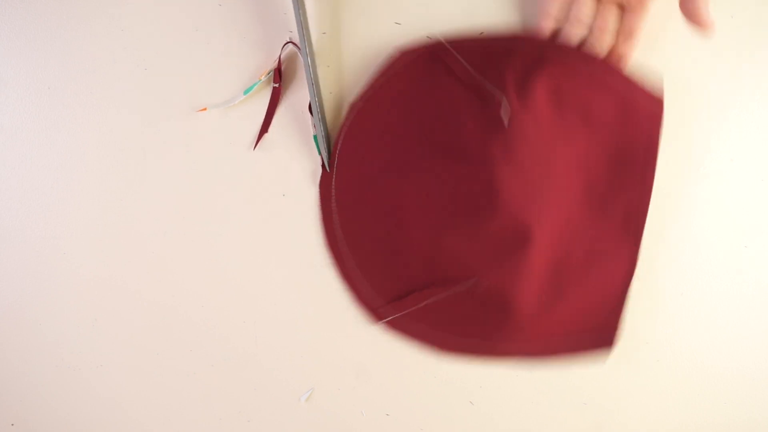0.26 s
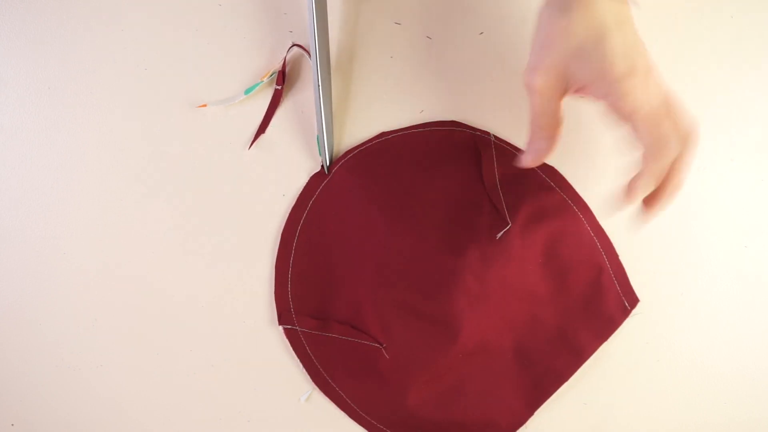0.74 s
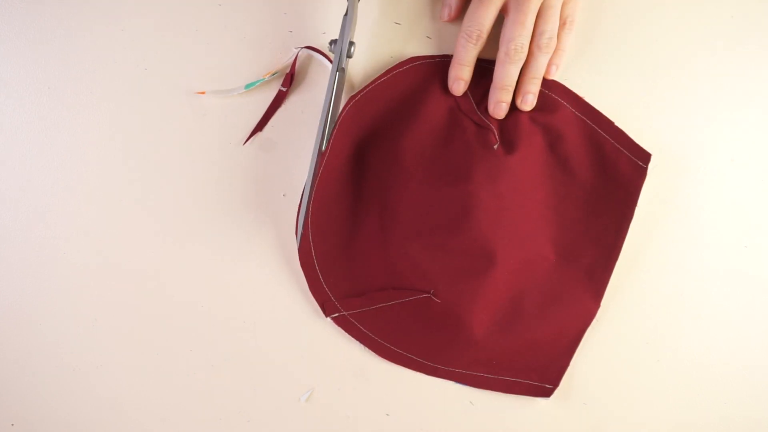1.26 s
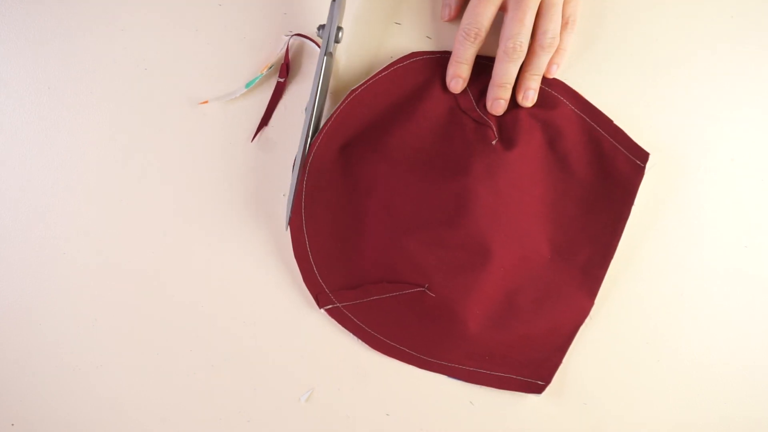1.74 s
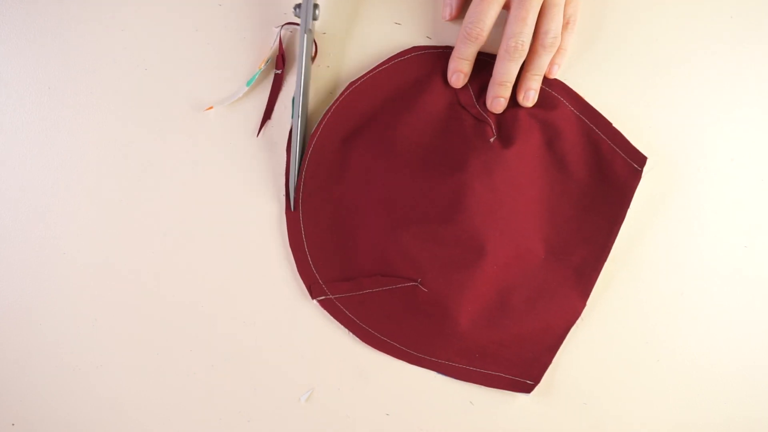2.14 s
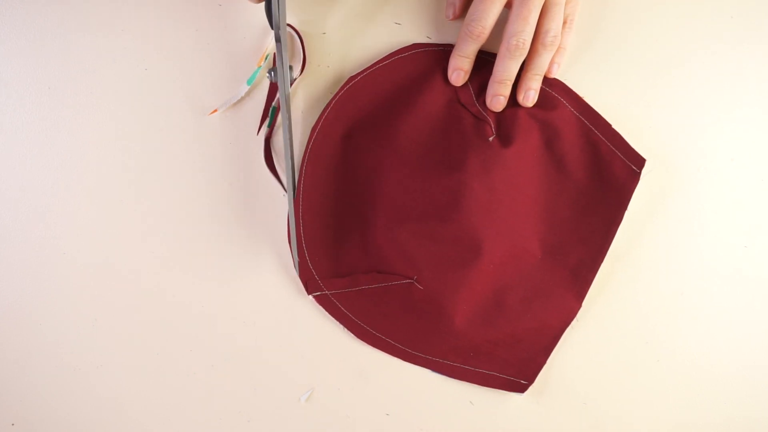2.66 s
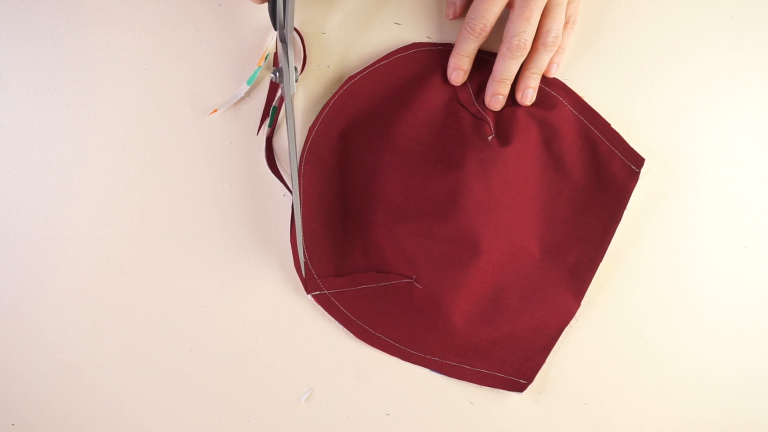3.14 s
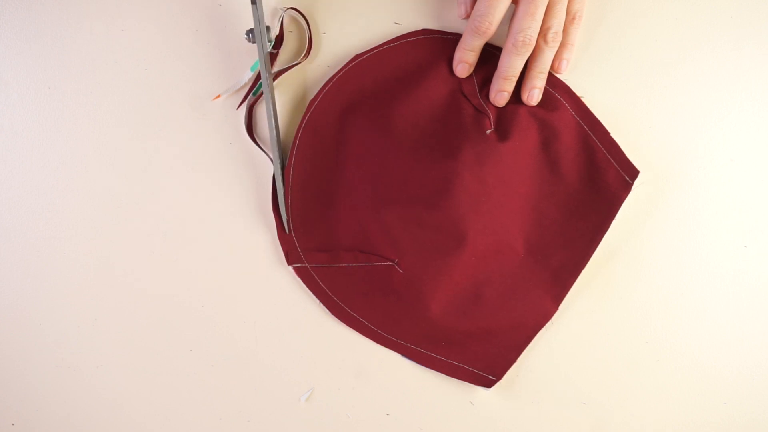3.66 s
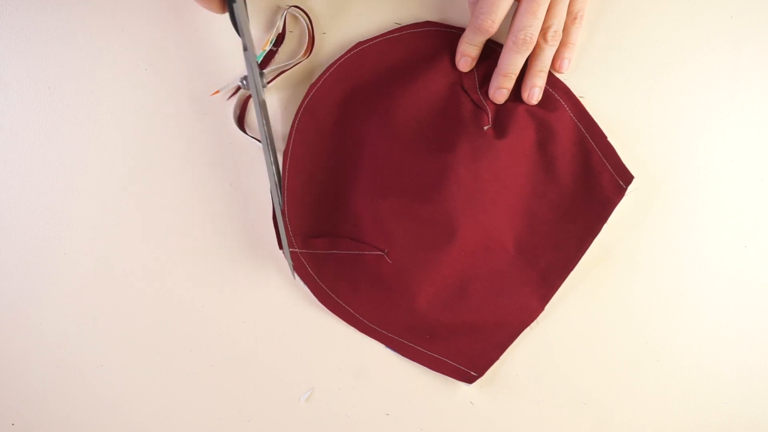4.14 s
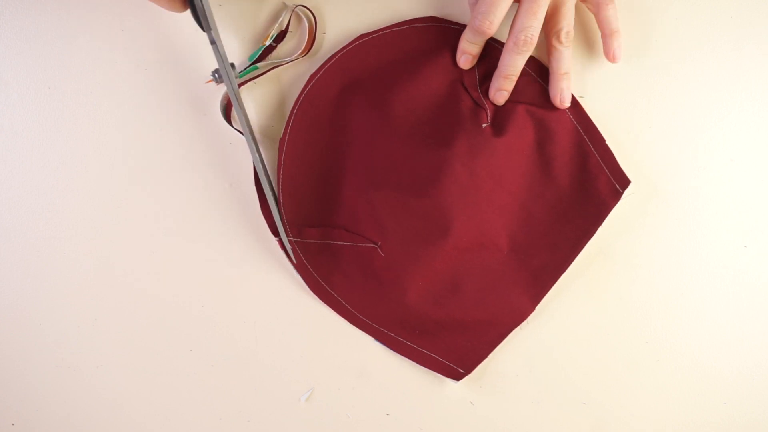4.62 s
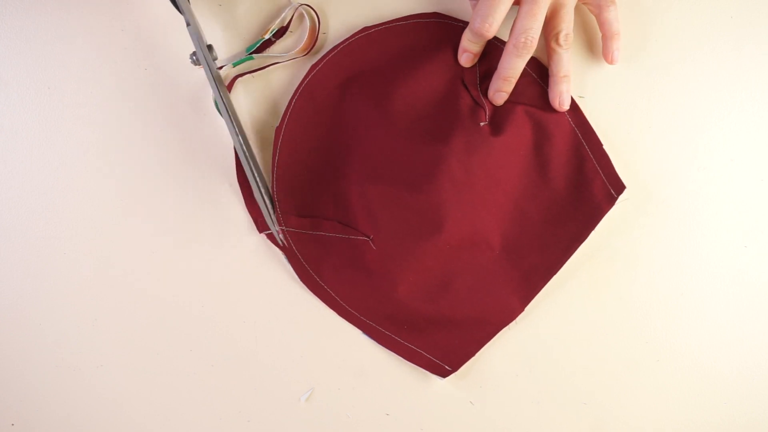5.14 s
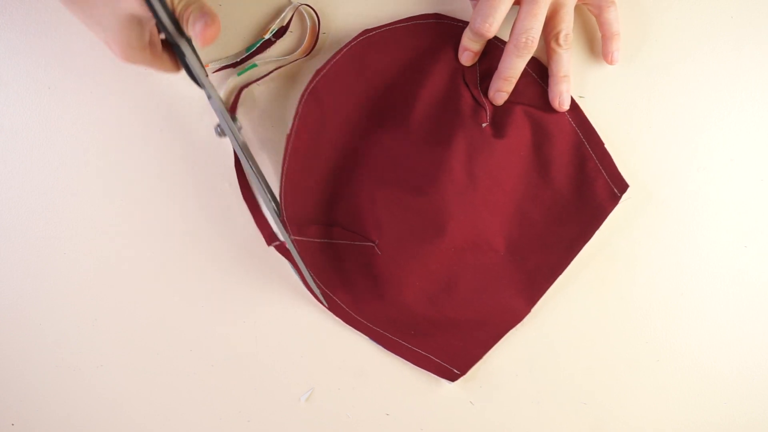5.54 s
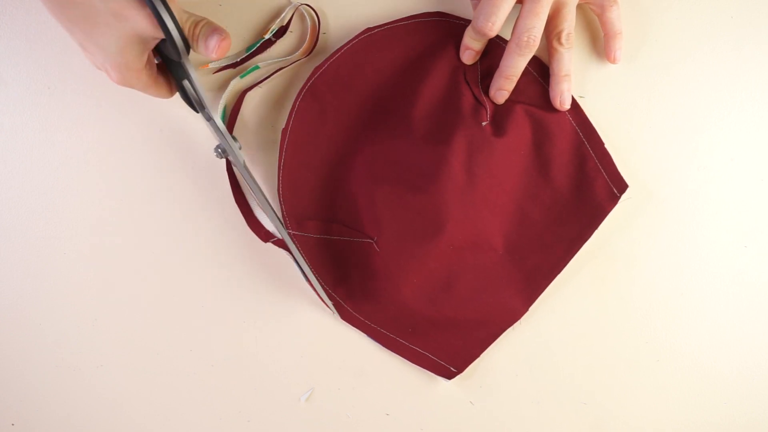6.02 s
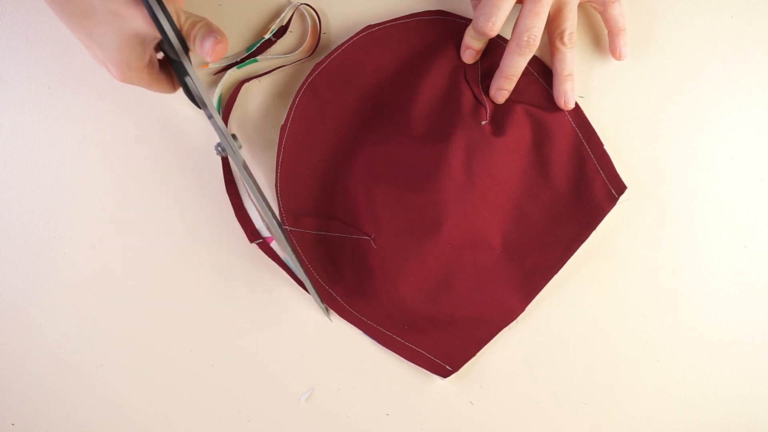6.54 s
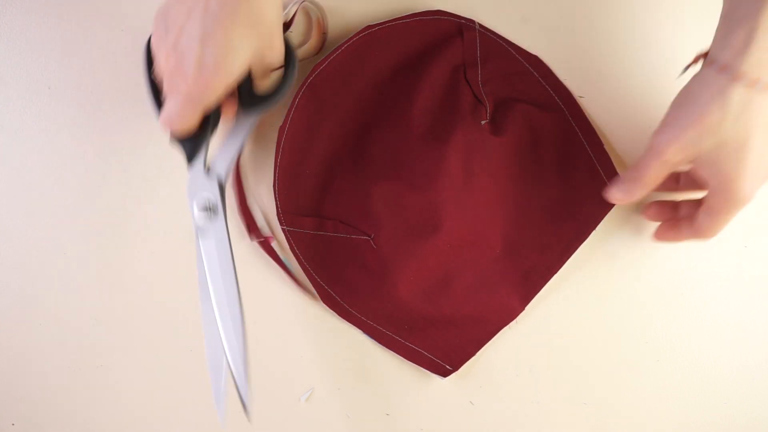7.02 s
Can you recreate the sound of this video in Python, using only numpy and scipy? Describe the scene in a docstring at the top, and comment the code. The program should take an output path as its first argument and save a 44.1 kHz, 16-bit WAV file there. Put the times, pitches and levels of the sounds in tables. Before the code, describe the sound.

Large tailor's scissors cut through cloth on a table in a small room. A short snip is followed by fabric sliding and a knock. Then come several separate scratchy strokes, some slow and some quick, with fibres crunching and blades hissing. Two of the later cuts end in a sharp steel clack. The cloth rubs softly over the table in the pauses and at the end, all heard from nearby.

```python
"""Cloth slides briefly over a table, then large tailor's scissors bite into it, in a small room.
In each slow stroke fibres snap between the edges, and the blades hiss, chatter and drum on the top.
Scissors and hands knock on the table, and some strokes end in a clack of steel on steel.
Between cuts the scissors are set down and the cloth is slid round by hand."""
import sys
import numpy as np
from scipy import signal
from scipy.fft import rfft, irfft
from scipy.io import wavfile
from scipy.ndimage import uniform_filter1d

SR = 44100
rng = np.random.default_rng(int(sys.argv[2]) if len(sys.argv) > 2 else 0)


def log_audio(samples):
    """Write samples as a 16-bit WAV file to the path given in sys.argv[1]."""
    # one column per channel
    frames = np.atleast_2d(samples).T
    # limit to full scale, then quantise
    limited = np.clip(frames, -1, 1)
    pcm = np.round(limited * 32767).astype(np.int16)
    wavfile.write(sys.argv[1], SR, pcm)


N = 321048
TIME_S = np.arange(N) / SR


def gain_of(db):
    """Decibels to gain."""
    return 10 ** (np.asarray(db) / 20)


def unit_rms(x):
    """Scales to rms 1."""
    return x / np.sqrt(np.mean(x ** 2) + 1e-20)


def lookup(table, hz):
    """Interpolates a table on a log-frequency axis."""
    table_hz, value = np.transpose(table)
    return np.interp(np.log(hz + 1), np.log(table_hz + 1), value)


def colour(x, spectrum, size=4096):
    """Minimum-phase filter of unit energy with this spectrum."""
    log_gain = np.log(gain_of(lookup(spectrum, abs(np.fft.fftfreq(size, 1 / SR)))))
    taps = np.fft.ifft(np.exp(np.conj(signal.hilbert(log_gain)))).real[:size // 2]
    return signal.oaconvolve(x, taps[None] / np.linalg.norm(taps), axes=1)[:, :N]


def resonate(x, hz, width_hz):
    """Two equal resonators in series; hz may vary over time."""
    turn = np.exp(2j * np.pi * np.cumsum(hz * np.ones(N)) / SR)
    pole = np.exp(-np.pi * width_hz / SR)
    for _ in range(2):
        x = (turn * signal.lfilter([np.sqrt(2 * (1 - pole ** 2))], [1, -pole], x / turn + 1e-18)).real
    return x


def noise():
    """White noise, mid and side."""
    return rng.standard_normal((2, N))


def mid_side(tone, side_db):
    """Complex tone to mid and side, a quarter cycle apart."""
    return np.array([tone.imag, gain_of(side_db) * tone.real])


def gate(start_s, rise_s, end_s, release_s):
    """Linear rise, hold, linear release."""
    return np.clip((TIME_S - start_s) / rise_s, 0, 1) * np.clip((end_s - TIME_S) / release_s + .5, 0, 1)


def blows(times_s, levels_db, decay_s):
    """Envelope of sudden blows with exponential decay."""
    impulses = np.zeros(N)
    impulses[np.round(times_s * SR).astype(int)] = gain_of(levels_db)
    return signal.lfilter([1], [1, -np.exp(-1 / (decay_s * SR))], impulses + 1e-15)


def bursts(times_s, levels_db, spectrum, decay_s):
    """One burst of coloured noise per blow."""
    return colour(np.sign(noise()) * blows(times_s, levels_db, decay_s), spectrum)


def crackle(per_s, spread_db, friction):
    """Tiny snaps of uneven size over smooth friction noise."""
    sizes = gain_of(spread_db * np.minimum(rng.exponential(1, N), 3.5))
    snaps = sizes * (rng.random(N) < per_s / SR) * np.sign(noise())
    return unit_rms(unit_rms(snaps) + friction * noise())


def weave(per_s, depth_db):
    """The cloth's resistance varies from thread to thread."""
    threads = rng.standard_normal(4000)
    return unit_rms(gain_of(depth_db * np.interp(TIME_S * per_s, np.arange(len(threads)), threads)))


# pushes: (start [s], rise [s], end [s], change by the end [dB], scuff [dB], rub [dB], swish [dB])
PUSHES = [(0.0, 0.0021, 0.06, -13, -52, -52, -69), (0.31, 0.081, 0.79, -28, -58, -45.5, -51),
          (0.844, 0.013, 1.48, -6.5, -71, -57, -63.5), (0.88, .12, 1.23, -8, -75, -80, -60.5),
          (1.105, .025, 1.264, -19.5, -47.5, -68, -72), (2.295, .015, 2.92, -25, -61.5, -59.5, -61),
          (3.75, 0.021, 4.11, -8, -63.5, -59, -63), (4.36, .03, 4.47, -7.5, -59, -53.5, -58.5),
          (4.601, 0.065, 4.9, -4.5, -59.5, -59.5, -67), (5.21, 0.014, 5.5, -15.5, -57.5, -64, -86),
          (5.42, 0.054, 5.81, 1.5, -80, -68, -85), (5.815, 0.012, 5.67, -4, -59, -77, -92),
          (6.639, 0.079, 6.91, -15.5, -56.5, -56, -65), (6.99, 0.0053, 7.26, -19, -52, -50.5, -63.5),
          (7.128, .015, 7.25, 1.5, -55.5, -51.5, -66)]
# heel of the hand, cloth rub, cloth swish: (frequency [Hz], level [dB])
SCUFF_SPECTRUM = [(50, -33), (85, 8.5), (140, -10), (215, 2), (310, 7.5), (430, 4), (560, -14), (900, -40),
                  (2500, -39)]
RUB_SPECTRUM = [(60, -30), (90, -35), (150, 0), (450, 6.5), (620, 6.5), (950, 4), (1340, 6.5), (1650, 2.5),
                (2500, 1), (3400, -6), (5000, -5.5), (11000, -35)]
SWISH_SPECTRUM = [(1470, -69.5), (2500, -5.5), (4760, 6), (7770, -2.5), (9300, 1.5), (10500, 1.5),
                  (11000, -2), (14300, -23), (22000, -120)]
def sliding(stop_s=0.0094):
    """Hand and cloth drag over the table, fading as they slow: low scuff, grainy rub, fine swish."""
    gains = np.zeros((3, N))
    for start_s, rise_s, end_s, change_db, *levels_db in PUSHES:
        progress = np.clip((TIME_S - start_s) / (end_s - start_s), 0, 1)
        envelope = gate(start_s, rise_s, end_s, stop_s) * gain_of(change_db * progress)
        gains += gain_of(levels_db)[:, None] * envelope
    scuff, rub, swish = gains
    drag = weave(per_s=110, depth_db=.8) * crackle(per_s=3500, spread_db=2, friction=.9)
    hand = colour(noise() * scuff, SCUFF_SPECTRUM)
    return hand + colour(drag * rub, RUB_SPECTRUM) + colour(drag * swish, SWISH_SPECTRUM)


# blade strokes: cuts, short snips and a faint hiss of the blades re-opening
# (start [s], bite [s], end [s], start closure [0-1], end closure [0-1],
# force [dB], rasp [dB], whine [dB], hiss [dB])
BLADE_STROKES = [(0.043, 0.034, 0.2, 0.68, 0.86, -38.5, -42, -44, -45.5),
                 (1.431, .63, 2.198, 0.0, 0.9, -38.5, -40.5, -41.5, -53.5),
                 (3.208, .1, 3.64, .2, 0.89, -40, -46, -34, -50),
                 (4.139, .09, 4.3, 0, 0.64, -36, -37.5, -33, -51),
                 (4.499, 0.025, 4.585, 0.7, 0.66, -47.5, -43.5, -46, -55),
                 (4.67, 0.0089, 4.74, 0.94, 0.88, -59.5, -59, -80, -66.5),
                 (4.923, 0.053, 5.064, 0.94, 0.8, -37.5, -34, -52, -49),
                 (6.085, 0.099, 6.43, 0.07, 0.92, -39.5, -51, -41, -57.5)]
# blade body, blade drumming on the table, cloth rasp: (frequency [Hz], level [dB])
BLADE_SPECTRUM = [(700, -49), (880, -28.5), (1020, -6), (1130, -6.5), (1230, -13), (1335, 2.5),
                  (1470, -8.5), (1660, -8.5), (1900, -28.5), (3000, -76)]
DRUM_SPECTRUM = [(30, -39.5), (66, -9.5), (84, 8.5), (103, -8), (130, -14), (160, -6.5), (300, -3),
                 (500, -5.5), (610, 2), (740, -4), (850, -16.5), (1200, -28)]
RASP_SPECTRUM = [(1200, -22), (1900, -5.5), (2250, 0.5), (2700, 0), (3200, -9.5), (4400, -11.5),
                 (6000, -17), (10000, -36.5)]
def cutting(lean_db=5, tips_db=11.5):
    """Snapping fibres shake blades and table while the edges scrape past each other."""
    force_db, rasp_db, whine_db, hiss_db = np.transpose(BLADE_STROKES)[5:]
    shut = closure()
    snaps = weave(per_s=150, depth_db=2.5) * crackle(per_s=2200, spread_db=3, friction=.55)
    scrape = weave(per_s=130, depth_db=4.5) * crackle(per_s=4500, spread_db=4.5, friction=1)
    force = snaps * pressure(force_db)
    # the lower blade leans harder on the table as the scissors shut
    drum = gain_of(-5.5) * colour(force * gain_of(lean_db * shut), DRUM_SPECTRUM)
    rasp = pressure(rasp_db) * gain_of(-3.5) * colour(snaps, RASP_SPECTRUM)
    whine = pressure(whine_db) * blade_whine(snaps)
    at_tips = np.clip((shut - .9) / .065 + .5, 0, 1)  # here the edges press together
    hiss = edge_hiss(scrape * pressure(hiss_db) * gain_of(tips_db * at_tips))
    return colour(force, BLADE_SPECTRUM) + drum + (rasp + whine) * gain_of(1.5 * shut - 3) + hiss


def closure():
    """Blade position over time: 0 open, 1 shut."""
    strokes = np.array(BLADE_STROKES)
    return np.clip(np.interp(TIME_S, strokes[:, [0, 2]].ravel(), strokes[:, 3:5].ravel()), 0, 1)


def pressure(levels_db, touch_s=0.004, bite_db=16.5, release_s=0.0071):
    """Envelope of all strokes: the edges touch, the pressure builds, holds and is let go."""
    gain = np.zeros(N)
    for (start_s, bite_s, end_s, *_), db in zip(BLADE_STROKES, levels_db):
        bite_left = np.clip(1 - (TIME_S - start_s) / bite_s, 0, 1)
        gain += gate(start_s, touch_s, end_s, release_s) * gain_of(db - bite_db * bite_left ** .62)
    return gain


# upper blade modes: (frequency [Hz], width [Hz], level [dB], closure exponent [-])
BLADE_MODES = [(2556, 510, -10, 0.032), (4270, 1140, -3, 3.2)]
def blade_whine(snaps):
    """Each mode picks a narrow band out of the snaps and grows as the blades overlap."""
    shut = closure()
    return sum(gain_of(db) * shut ** exponent * unit_rms(resonate(snaps, hz, width_hz))
               for hz, width_hz, db, exponent in BLADE_MODES)


# edge scraping on edge: (frequency [Hz], level [dB])
EDGE_SPECTRUM = [(2500, -32.5), (3600, 5.5), (4600, -4.5), (5800, 3), (7300, -3.5), (8700, 4), (10000, 0.5),
                 (11200, 0)]
def edge_hiss(scrape, open_hz=10450, fall_hz=1300):
    """The edges hiss and sing; their note falls as the crossing point runs out to the tips."""
    song = resonate(scrape, open_hz - fall_hz * closure() ** 4, width_hz=1000)
    return gain_of(-15) * song + gain_of(-2) * colour(scrape, EDGE_SPECTRUM)


# a blade catches on a tough thread and slips through: (time [s], chatter [dB], hiss [dB])
THREAD_SLIPS = [(0.1226, -26, -35), (.142, -22, -46), (.178, -32, -34), (1.45, -41, -56), (1.554, -30, -54),
                (1.586, -30.5, -56), (1.6595, -23.5, -44.5), (1.717, -20, -37.5), (1.7852, -21.5, -41),
                (1.815, -23, -48), (1.829, -24.5, -40), (1.857, -26.5, -40.5), (1.9115, -18, -41.5),
                (1.962, -24.5, -54), (1.986, -24.5, -56), (2.0235, -20, -48), (2.062, -34, -38.5),
                (2.0855, -27, -34), (2.1007, -24, -34), (2.127, -22.5, -32), (2.146, -17, -31.5),
                (2.172, -24, -32), (2.188, -37, -37), (2.2957, -30.5, -56), (3.306, -26.5, -54),
                (3.371, -25.5, -49), (3.468, -20, -54), (3.502, -22, -37.5), (3.531, -21, -33),
                (3.56, -21.5, -33), (3.595, -18, -31), (4.105, -34.5, -53), (4.178, -37, -49),
                (4.1988, -27, -45), (4.223, -19, -43), (4.2424, -19.5, -49), (4.568, -29, -47),
                (4.893, -38.5, -48.5), (4.95, -27.5, -35), (4.9857, -19, -54), (5.134, -29.5, -48),
                (5.239, -41.5, -68), (6.129, -34.5, -49), (6.19, -22.5, -40.5), (6.26, -26.5, -56),
                (6.307, -20.5, -48), (6.34, -18, -43.5), (6.365, -20, -37), (6.398, -20, -39)]
def slips(note_hz=1332, spread=.022, wander=.0558, peak_s=0.005, width_s=0.0037):
    """Stick-slip swells a blade's bending note for a few cycles, with a spurt of torn fibres."""
    envelopes, detune = np.zeros((2, N)), np.zeros(N)
    for time_s, *levels_db in THREAD_SLIPS:
        span = slice(round((time_s - .02) * SR), round((time_s + .04) * SR))
        pulse = np.exp(-.5 * ((TIME_S[span] - time_s - peak_s) / width_s) ** 2)
        envelopes[:, span] += gain_of(levels_db)[:, None] * pulse
        detune[round(time_s * SR):] = spread * rng.standard_normal()
    swell, spurt = envelopes
    drift = unit_rms(uniform_filter1d(rng.standard_normal(N), size=90))
    pitch_hz = note_hz * (1 + detune + wander * drift)
    note = swell * np.exp(2j * np.pi * np.cumsum(pitch_hz) / SR)
    chatter = gain_of(-5) * mid_side(note, side_db=-7)
    fibres = crackle(per_s=3500, spread_db=9, friction=1)
    drum = gain_of(-19) * colour(swell * fibres, DRUM_SPECTRUM)
    rasp = gain_of(-24.5) * colour(swell * fibres, RASP_SPECTRUM)
    whine = gain_of(-21) * swell * blade_whine(fibres)
    return chatter + drum + rasp + whine + edge_hiss(spurt * fibres)


# scissors and hands bump the table: (time [s], ring [dB], thud [dB], rap [dB])
BUMPS = [(0.322, -36.5, -42, -42.5), (1.3018, -22, -32.5, -44.5), (1.357, -39, -46, -61.5),
         (1.537, -36.5, -37.5, -43), (2.8097, -25, -30, -40), (3.005, -56, -45, -65),
         (3.235, -44, -39.5, -66), (3.249, -33, -35.5, -40.5), (3.597, -38, -25, -45),
         (4.245, -33, -33.5, -54), (4.973, -27.5, -26, -19.5), (6.409, -17.5, -23, -26),
         (6.993, -52, -44, -54)]
# table top modes: (frequency [Hz], level [dB], t60 [s])
TOP_MODES = [(196, -29, .06), (303, -14, .04), (439, -2, 0.033), (571, -13.5, 0.04), (750, -4.5, 0.028),
             (825, -16, 0.018)]
# table thud, pivot rap: (frequency [Hz], level [dB])
THUD_SPECTRUM = [(30, -50.5), (60, -6), (85, 9), (120, -3), (170, -1.5), (240, 5), (300, -0.5), (430, 2.5),
                 (510, -19), (650, 0.5), (800, -4.5), (950, -29), (1300, -7.5), (2600, -43)]
RAP_SPECTRUM = [(600, -21.5), (1300, -0.5), (1900, 2.5), (2550, 3), (3000, -0.5), (3600, -4), (4500, -23),
                (9000, -36)]
def knocks(contact_s=0.00032):
    """The table top rings briefly and thuds; the loose pivot adds a rap."""
    times_s, ring_db, thud_db, rap_db = np.transpose(BUMPS)
    t = TIME_S[:SR // 4]
    top = sum((-1) ** k * gain_of(db) * np.exp((2j * np.pi * hz - np.log(1000) / t60_s) * t)
              for k, (hz, db, t60_s) in enumerate(TOP_MODES))
    top *= 1 - np.exp(-t / contact_s)  # padded contact builds gradually
    ring = signal.oaconvolve(blows(times_s, ring_db, decay_s=.1 / SR), top)[:N]
    thud = bursts(times_s, thud_db, THUD_SPECTRUM, decay_s=.0051)
    rap = bursts(times_s, rap_db, RAP_SPECTRUM, decay_s=.0032)
    return mid_side(ring, side_db=-11) + thud + rap


# blade contacts, from light ticks to clacking shut: (time [s], ring [dB], click [dB])
CONTACTS = [(1.1778, -44.5, -39.5), (3.5966, -54, -31), (4.1407, -44.5, -43.5), (4.482, -41, -40),
            (4.965, -26, -15.5), (5.538, -56, -74), (6.4074, -16, -17.5)]
# steel ring, treble click: (frequency [Hz], level [dB])
STEEL_SPECTRUM = [(500, -41), (900, 1.5), (1300, 10), (1750, 2.5), (2100, 1.5), (2600, 9.5), (3200, 1.5),
                  (4000, -10.5), (7000, -40), (11000, -28)]
CLICK_SPECTRUM = [(2500, -18), (5000, 8.5), (7500, 10), (9000, 14), (11000, 12)]
def clacks():
    """Steel hits steel: a brief click and a ring that the hand damps at once."""
    times_s, ring_db, click_db = np.transpose(CONTACTS)
    ring = bursts(times_s, ring_db, STEEL_SPECTRUM, decay_s=.0045)
    return ring + bursts(times_s, click_db, CLICK_SPECTRUM, decay_s=.002)


# room decay: (frequency [Hz], t60 [s])
ROOM_T60 = [(80, 0.53), (300, 0.46), (1300, 0.41), (3000, 0.41), (10000, 0.33)]
def room(x, gap_s=0.0029, slot_samples=20):
    """Sparse reflections of random sign, each band dying at its own rate."""
    slots = np.arange(0, SR - slot_samples, slot_samples)
    arrivals = slots + rng.integers(0, slot_samples, (2, len(slots)))
    taps = np.zeros((2, SR))
    np.put_along_axis(taps, arrivals, rng.choice([-1., 1.], arrivals.shape), 1)
    hz, t, bands = signal.stft(taps * (TIME_S[:SR] > gap_s), SR, nperseg=256)
    decay = gain_of(-60 * t / lookup(ROOM_T60, hz)[:, None])
    tail = signal.istft(bands * decay, SR, nperseg=256)[1]
    return signal.fftconvolve(x, tail / np.linalg.norm(tail[0]), axes=1)[:, :N]


# room air: (frequency [Hz], level [dB])
AIR_SPECTRUM = [(15, -47), (25, -21), (54, -19.5), (92, -5.5), (141, -13), (381, -17), (778, -24.5),
                (907, -28), (979, -26), (1510, -23.5), (2000, -24.5), (3970, -30), (11000, -35.5),
                (14300, -73), (22000, -120)]
def air():
    """Faint, steady, mostly low noise of the room."""
    return gain_of(-64) * colour(noise(), AIR_SPECTRUM)


def left_right(x, width):
    """Mid and side to left and right, with a side gain per band."""
    side = irfft(rfft(x[1]) * gain_of(lookup(width, np.fft.rfftfreq(N, 1 / SR))), N)
    return np.array([x[0] + side, x[0] - side])


# stereo width, direct and ambient: (frequency [Hz], side gain [dB])
DIRECT_WIDTH = [(60, -33), (190, -28), (350, -20), (620, -14), (1200, -7.5), (2200, -9.5), (3600, -0.5),
                (6450, -1), (11600, -5)]
AMBIENT_WIDTH = [(40, -17), (80, -22), (130, -12.5), (350, -6.5), (620, -2.5), (1200, -1.5), (2200, -4),
                 (3600, 1.5), (11000, -1.5)]
def scene(bounce_s=.0062):
    """The sources on the table sound near the middle; the room and its air are wider."""
    cloth = cutting() + slips() + sliding()
    bumps, steel = knocks(), clacks()
    send = gain_of(-5.5) * cloth + gain_of(-2.5) * bumps + gain_of(-3) * steel
    # first reflection off a nearby surface
    bounce = gain_of(-15.5) * np.pad(send, ((0, 0), (round(bounce_s * SR), 0)))[:, :N]
    ambient = room(send) + bounce + air()
    return left_right(cloth + bumps + steel, DIRECT_WIDTH) + left_right(ambient, AMBIENT_WIDTH)


def record(dry):
    """Steep low-pass at 11.2 kHz."""
    lowpass = signal.firwin(511, 11200, window=("kaiser", 9), fs=SR)
    return signal.oaconvolve(dry, lowpass[None], "same")


dry = scene()
out = record(dry)
log_audio(out)
```